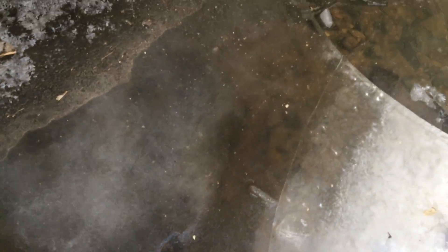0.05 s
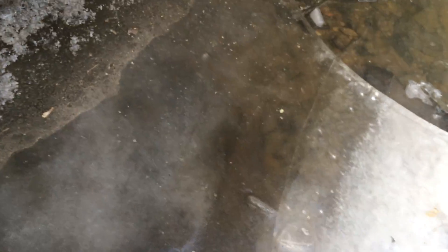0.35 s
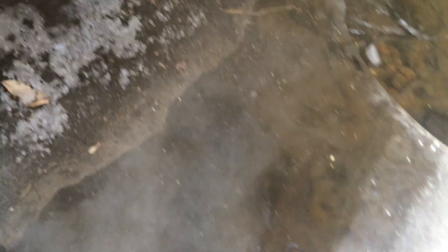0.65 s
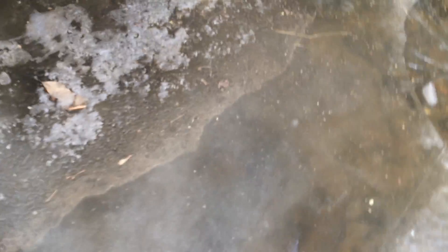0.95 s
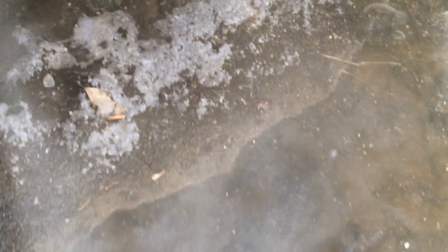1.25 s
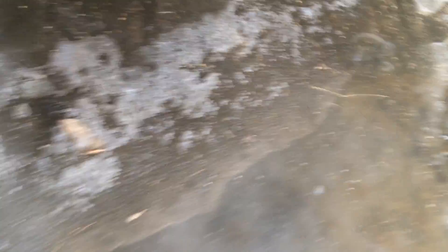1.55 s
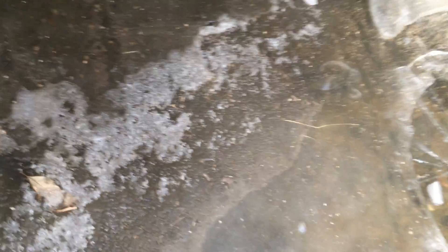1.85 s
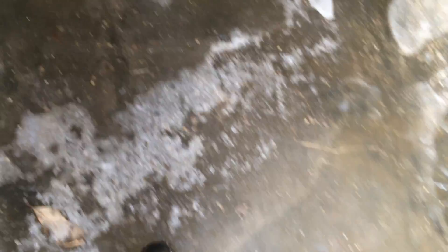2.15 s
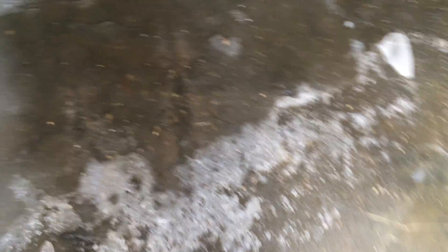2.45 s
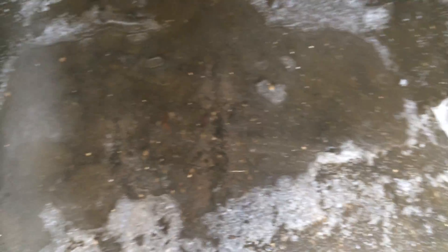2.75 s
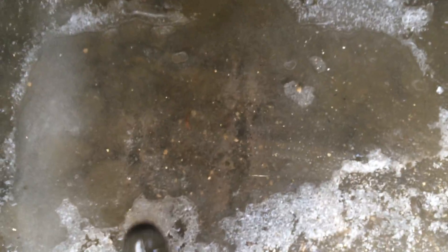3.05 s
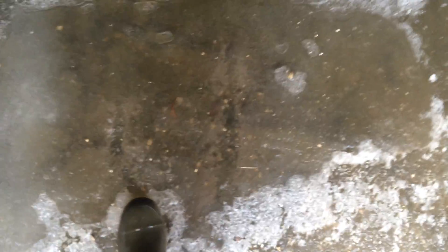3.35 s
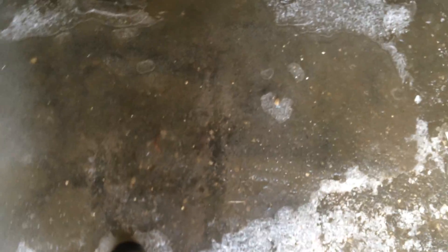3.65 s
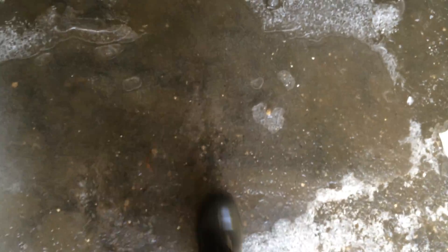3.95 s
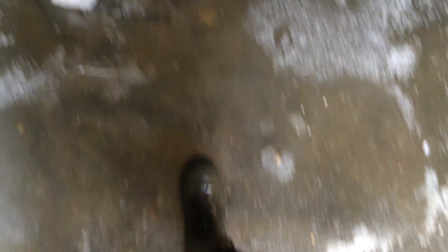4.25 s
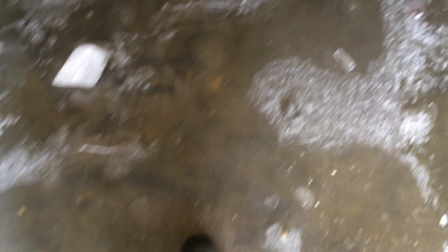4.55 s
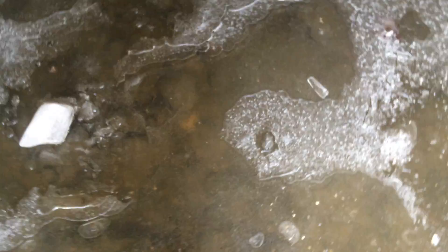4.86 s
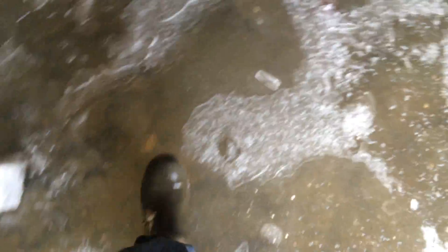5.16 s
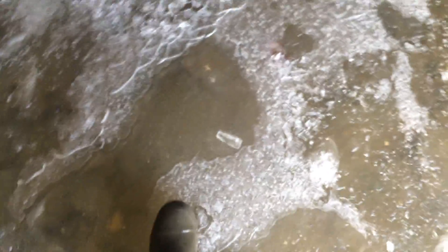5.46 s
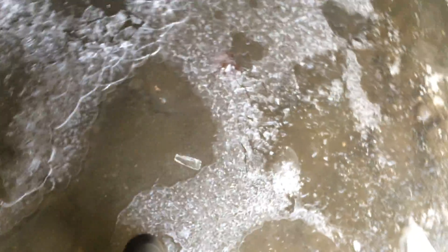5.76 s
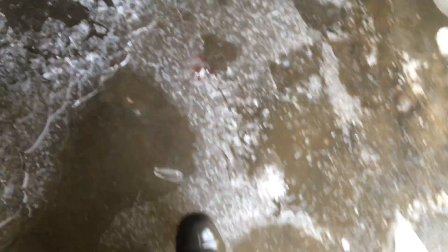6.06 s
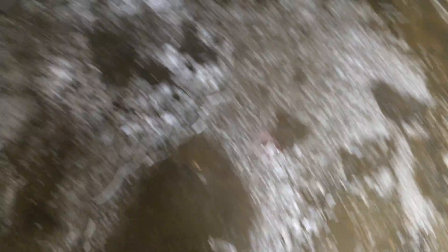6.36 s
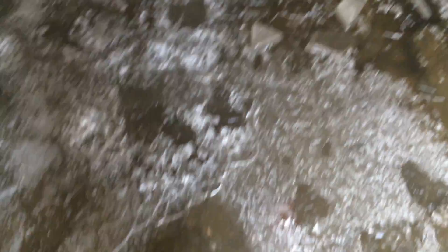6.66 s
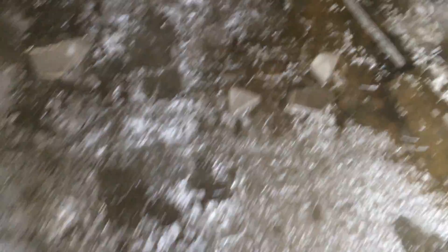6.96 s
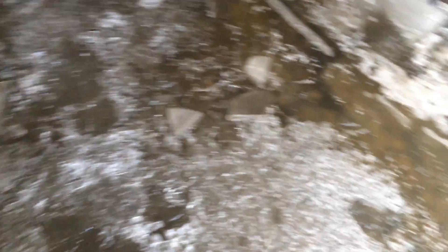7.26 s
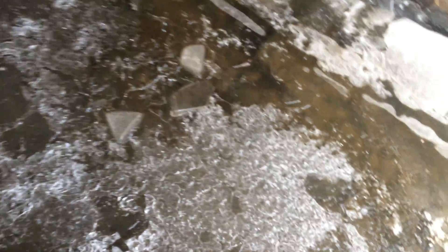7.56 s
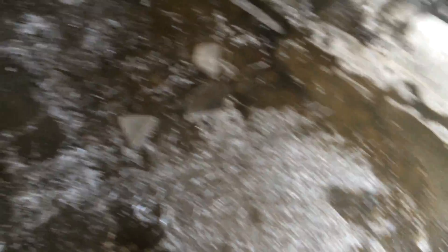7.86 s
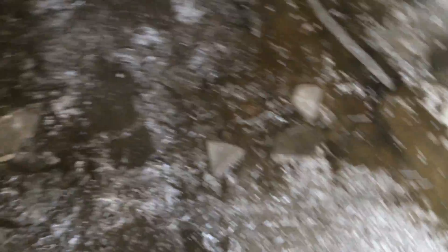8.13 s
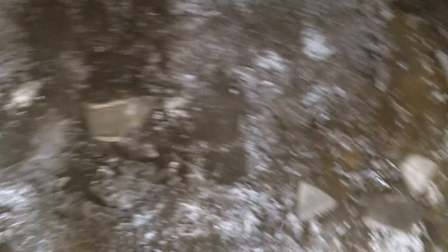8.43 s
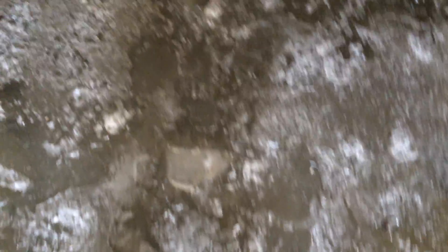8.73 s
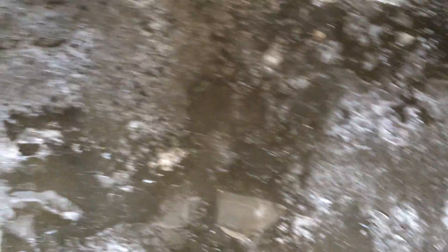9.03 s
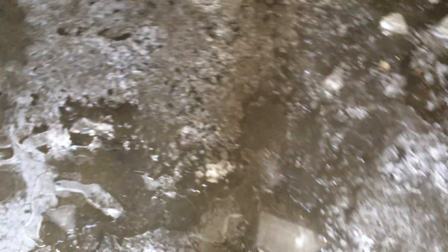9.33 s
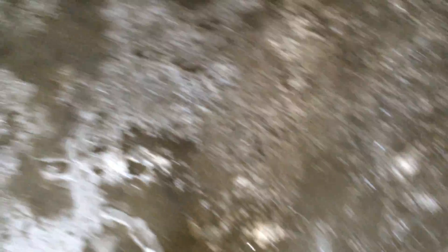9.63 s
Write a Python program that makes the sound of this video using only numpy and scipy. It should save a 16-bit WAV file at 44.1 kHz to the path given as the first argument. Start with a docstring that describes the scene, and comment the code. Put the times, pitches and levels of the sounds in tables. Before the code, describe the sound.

A boot cracks thin ice and sloshes through a shallow puddle, with wet crunching, bubbles and faint distant traffic.

```python
"""A boot on thin ice

A rubber boot treads on thin ice over a shallow puddle, outdoors. The sheet gives way in bursts of
tiny fractures and wet crumbs grind under the sole. Water and slush are pushed about in short surges
and gurgle between the pieces, where trapped air rings as bubbles. Towards the end the boot wades on
with dull thuds. A far engine speeds up and eases off over traffic, and a small bird calls once."""
import sys
import numpy as np
from scipy import signal
from scipy.fft import rfft, irfft
from scipy.io import wavfile

SR = 44100
rng = np.random.default_rng(int(sys.argv[2]) if len(sys.argv) > 2 else 0)


def master(y):
    """Save y as 16-bit WAV."""
    cut = np.clip(np.atleast_2d(y).T, -1, 1)
    pcm = np.round(cut * 32767)  # scale
    wavfile.write(sys.argv[1], SR, pcm.astype(np.int16))


N = 431738


def from_db(db):
    """Amplitude grows tenfold for every 20 dB."""
    return 10 ** (np.asarray(db) / 20)


def unit_rms(x):
    """Normalisation to a mean power of 1."""
    return x / np.sqrt(np.mean(x ** 2) + 1e-20)


def curves(rows):
    """Linear interpolation of each column at every sample; the first column is time."""
    times, *columns = np.transpose(rows)
    return [np.interp(np.arange(N) / SR, times, column) for column in columns]


def add(track, start_s, sound):
    """Superposition: a short sound adds to a track."""
    start = int(round(start_s * SR))
    sound, start = sound[max(0, -start):], max(0, start)
    track[start:start + len(sound)] += sound[:max(0, N - start)]


def butter(x, hz, kind, order=2):
    """A causal Butterworth filter, maximally flat in its passband."""
    sections = signal.butter(order, np.clip(hz, 10, SR * 4 / 9), kind, fs=SR, output="sos")
    return signal.sosfilt(sections, x + 1e-18)


def resonate(x, hz, width_hz):
    """A damped resonator with a peak gain of 1."""
    r = np.exp(-np.pi * width_hz / SR)
    feedback = [1, -2 * r * np.cos(2 * np.pi * hz / SR), r * r]
    return signal.lfilter(np.array([1, 0, -1]) * (1 - r * r) / 2, feedback, x + 1e-18)


def drift(rate_hz):
    """Low-passed noise: a smooth random fluctuation of rms 1."""
    r = np.exp(-80 * np.pi * rate_hz / SR)
    slow = signal.lfilter([1], [1, -2 * r, r * r], rng.standard_normal(N // 40 + 2002))[2000:]
    return np.interp(np.arange(N) / 40, np.arange(len(slow)), unit_rms(slow))


def coloured(x, spectrum, size=4096):
    """Minimum-phase filtering imposes a spectral envelope; the result has rms 1."""
    hz, db = np.transpose(spectrum)
    grid_hz = np.maximum(np.fft.rfftfreq(size, 1 / SR), 1)
    gain = from_db(np.interp(np.log(grid_hz), np.log(hz), db))
    cepstrum = irfft(np.log(gain))
    cepstrum[1:size // 2] *= 2
    cepstrum[size // 2 + 1:] = 0
    response = irfft(np.exp(rfft(cepstrum)))
    return unit_rms(signal.oaconvolve(x, response)[:N])


def impulses(per_s, spread_db, size=N):
    """A Poisson process of clicks, many small and a few large."""
    heights = from_db(spread_db * np.minimum(rng.exponential(1, size), 4))
    return heights * rng.choice([-1, 1], size) * (rng.random(size) < per_s / SR)


def pings(per_s, low_hz, high_hz, cycles, spread_db, rise):
    """Damped oscillators start at random, each gliding up as it dies; their sum has rms 1."""
    when, pitch, size, length = rng.random((int(per_s * N / SR), 4)).T[:, :, None]
    hz = low_hz * (high_hz / low_hz) ** pitch
    t = np.arange(int(min(3 * cycles / low_hz, .025) * SR) + 8) / SR
    age = t * hz / (cycles * (.5 + length))  # in decay times
    height = from_db(spread_db * np.minimum(-np.log(1 - size), 4))
    phase = 2 * np.pi * hz * t * (1 + rise * np.minimum(age, 4))
    waves = height * np.sin(phase) * np.exp(-age) * (1 - np.exp(-t * hz))
    samples = (when * N).astype(int) + np.arange(len(t))
    return unit_rms(np.bincount(samples.ravel(), waves.ravel(), N)[:N])


def reflections(x, t60_s, cutoff_hz):
    """Diffuse reflection from ground and surroundings: a decaying noise tail of unit energy."""
    t = np.arange(SR // 2) / SR
    tail = butter(rng.standard_normal(len(t)), cutoff_hz, "low", order=1)
    tail *= from_db(-60 * t / t60_s) * (1 - np.exp(-t / 0.00033))
    return signal.oaconvolve(x, tail / np.linalg.norm(tail))[:N]


# The engine's run. Each row: time in seconds, firing rate in Hz, relative level in dB.
ENGINE_RUN = [(0, 62, -47.5), (1.3, 72.5, -44.5), (1.55, 75, -38), (2.4, 83.2, -34.5), (3.1, 92.4, -38),
              (3.5, 98, -45.5), (3.9, 104.5, -44.5), (4.3, 85, -50), (5.2, 70, -64), (5.8, 101, -64),
              (6.8, 106, -59.5), (7.6, 95, -51), (7.8, 93, -83)]
# Its partials. Each row: multiple of the firing rate, relative level in dB.
ENGINE_ORDERS = [(1, -2.5), (1.5, -16.5), (2, -21)]

def engine(gain_db=2.0, waver_db=2.0):
    """Periodic firing radiates a series of orders, of which only the lowest carry far."""
    firing_hz, db = curves(ENGINE_RUN)
    phase = 2 * np.pi * np.cumsum(firing_hz) / SR
    tone = sum(from_db(order_db + waver_db * drift(4.4)) * np.sin(order * phase)
               for order, order_db in ENGINE_ORDERS)
    return np.sqrt(2) * from_db(db + gain_db) * tone


# The traffic's swell. Each row: time in seconds, rms level in dB.
TRAFFIC_LEVELS = [(0, -45), (1.1, -50), (3.2, -45.5), (5.4, -54), (6.5, -50.5), (8.2, -53), (8.8, -46),
                  (9.3, -49.5), (9.79, -45)]
# Its spectrum. Each row: frequency in Hz, relative spectral density in dB.
TRAFFIC_SPECTRUM = [(20, -31), (40, -4), (65, -1), (90, 1.5), (130, -2), (190, -5.5), (280, -24),
                    (500, -21), (1000, -64)]

def traffic():
    """Far traffic sums incoherently to a low rumble of noise."""
    return from_db(curves(TRAFFIC_LEVELS)[0]) * coloured(rng.standard_normal(N), TRAFFIC_SPECTRUM)


# Pushes on the slush. Each row: end of the rise in seconds, hold in seconds, slosh and crunch in dB.
SLUSH_SURGES = [(0.0, .19, -52, -55.5), (0.498, 0.095, -50.5, -57.5), (0.996, 0.091, -53.5, -68),
                (1.262, 0.15, -52, -62), (1.522, 0.1, -51, -58.5), (1.712, .11, -52, -59),
                (1.997, 0.045, -54, -62.5), (2.241, 0.081, -51.5, -60), (2.403, 0.19, -47.5, -57),
                (2.772, 0.1, -50, -58.5), (3.077, 0.42, -53.5, -59), (3.622, 0.063, -45.5, -57.5),
                (3.9, 0.13, -46.5, -57.5), (4.152, 0.13, -50, -60), (4.428, 0.13, -52, -60),
                (4.67, 0.28, -54, -62.5), (5.816, 0.017, -56, -72), (5.957, 0.14, -51, -62.5),
                (6.358, 0.3, -56.5, -62), (6.498, 0.025, -44, -55), (6.721, 0.029, -51.5, -56),
                (6.992, 0.42, -61, -66.5), (7.377, 0.066, -45.5, -56), (7.608, 0.053, -58.5, -60),
                (7.885, .14, -52, -63), (8.203, .14, -50.5, -57), (8.487, 0.068, -46.5, -51.5),
                (8.776, 0.12, -45.5, -53.5), (9.084, 0.097, -47.5, -57), (9.404, 0.099, -55, -50),
                (9.688, 0.13, -47, -51.5)]
# The puddle's motion between surges. Each row: time in seconds, level in dB.
PUDDLE_LAPPING = [(0, -50.5), (0.65, -55.5), (0.85, -57.5), (2.1, -56), (2.6, -50.5), (4.3, -52.5),
                  (5.3, -60.5), (5.6, -56.5), (6.3, -53), (6.85, -56.5), (7.15, -55), (7.75, -58.5),
                  (8.7, -51), (9.79, -48.5)]

def stirring(attack_s=0.072, release_s=0.045, crumbs_db=-13):
    """Incoherent powers add: surges on top of lapping give the slosh and crunch levels in dB."""
    lapping = from_db(curves(PUDDLE_LAPPING)[0])
    water_power = lapping ** 2
    crumb_power = (from_db(crumbs_db) * lapping) ** 2  # floating crumbs rub with the lapping
    age = np.arange(SR) / SR - attack_s
    for full_s, hold_s, slosh_db, crunch_db in SLUSH_SURGES:
        surge = np.clip(1 + age / attack_s, 0, 1) * np.exp(-np.maximum(age - hold_s, 0) / release_s)
        add(water_power, full_s - attack_s, (from_db(slosh_db) * surge) ** 2)
        add(crumb_power, full_s - attack_s, (from_db(crunch_db) * surge) ** 2)
    return 10 * np.log10(water_power), 10 * np.log10(crumb_power)


# The water's wash. Each row: frequency in Hz, relative spectral density in dB.
WASH_SPECTRUM = [(120, -12), (250, 5.5), (500, 4), (1000, 2.5), (1700, 0.5), (2600, -9), (4000, -19.5),
                 (6500, -20), (15000, -30.5)]

def slosh(level_db, plop_db=-7.0, wash_db=-1.5):
    """Air entrainment: over a soft wash, small bubbles gain in share as the water moves more."""
    plops = pings(per_s=480, low_hz=520, high_hz=3750, cycles=2.3, spread_db=7.5, rise=0.01)
    plops = unit_rms(butter(plops, 3000, "low", order=1))
    activity = np.clip((level_db + 59) / 11, 0, 1)
    wash = coloured(rng.standard_normal(N), WASH_SPECTRUM) * from_db(drift(33))
    return from_db(level_db) * (from_db(plop_db) * activity * plops + from_db(wash_db) * wash)


# The hiss of grinding ice. Each row: frequency in Hz, relative spectral density in dB.
HISS_SPECTRUM = [(1500, -1), (3000, 6), (5000, -4.5), (7000, -0.5), (9500, -1), (12500, -1.5),
                 (15500, -5.5)]

def crunch(level_db, tick_db=-5.0, hiss_db=-1.0):
    """Granular friction: wet crumbs grind under the sole, giving pitched ticks over a fine hiss."""
    ticks = pings(per_s=450, low_hz=3520, high_hz=15000, cycles=3.1, spread_db=4.0, rise=.005)
    ticks = unit_rms(butter(ticks, 6800, "high", order=1))
    hiss = coloured(rng.standard_normal(N), HISS_SPECTRUM) * from_db(3.75 * drift(42))
    activity = np.clip((level_db + 81.0) / 18, 0, 1)
    return from_db(level_db) * (from_db(tick_db) * activity * ticks + from_db(hiss_db) * hiss)


# A chip's tick. Each row: frequency in Hz, relative spectral density in dB.
CHIP_SPECTRUM = [(700, -7), (1600, 6), (2900, 2), (4500, 12.5), (7500, 5.5), (12000, 7), (15500, -5)]

def chips(crunch_db, relative_db=-13.5, decay_s=0.00078):
    """Shot noise: crumbs chip off at random, as lone brittle ticks that stand out of the crunch."""
    t = np.arange(SR // 100) / SR
    burst = rng.standard_normal(len(t)) * np.exp(-t / decay_s)
    ticks = signal.oaconvolve(impulses(per_s=29, spread_db=7.0), burst)[:N]
    return from_db(crunch_db + relative_db) * coloured(ticks, CHIP_SPECTRUM)


# Ice cracks, and a brief soft rush of noise leading into two of the loud ones (at 4.849 and 6.454 s).
# Each row: start in seconds, knock level in dB, knock pitch in Hz, snap level in dB, snap pitch in Hz,
# splinter level in dB, decay in seconds.
CRACKS_AND_RUSHES = [(0.039, -33, 930, -34.5, 1900, -51, 0.013), (0.074, -37.5, 574, -45, 1260, -63, 0.01),
                     (0.138, -41.5, 570, -41, 1720, -48, .011), (0.175, -65, 630, -64, 1730, -47.5, .011),
                     (0.206, -42.5, 980, -54, 1390, -47, 0.0078),
                     (0.3905, -20.5, 590, -28.5, 2430, -34.5, 0.0022),
                     (0.399, -27, 600, -28.5, 1710, -38, 0.018), (0.513, -60, 900, -41, 2210, -55, .006),
                     (0.538, -66, 760, -39, 1780, -44, 0.011), (0.575, -64, 930, -36.5, 2230, -58, 0.0091),
                     (1.164, -65, 630, -73, 1670, -59, 0.0016), (1.544, -44, 770, -44, 2360, -47.5, 0.0051),
                     (1.572, -43, 710, -40.5, 2300, -45, 0.0034),
                     (2.4024, -27.5, 744, -20.5, 1380, -48, 0.0023),
                     (2.405, -18, 642, -22, 1500, -30, 0.0033), (2.547, -40.5, 750, -39.5, 1490, -58, 0.01),
                     (2.672, -66, 460, -51, 2130, -48.5, 0.00098),
                     (2.8206, -59, 826, -44.5, 1820, -47.5, 0.0077),
                     (2.9033, -48, 1080, -30.5, 1380, -52.5, 0.0029),
                     (3.103, -51, 640, -41, 3250, -51.5, 0.0023),
                     (3.202, -43.5, 676, -43, 2360, -58, 0.0023),
                     (3.241, -43, 1000, -40.5, 1600, -57, 0.0028),
                     (3.472, -52, 765, -44.5, 2380, -52, .007), (3.742, -42.5, 730, -60, 1690, -64, 0.0064),
                     (4.0208, -40, 440, -37, 1430, -59, .0055),
                     (4.1269, -42.5, 420, -39.5, 2100, -43.5, 0.013),
                     (4.2183, -43, 874, -41, 1570, -57, 0.0031),
                     (4.516, -43, 720, -38.5, 1410, -55, 0.0078), (4.77, -66, 700, -69, 3680, -65, .002),
                     (4.849, -37, 556, -35.5, 2130, -51, 0.012),
                     (4.8547, -28.5, 740, -30, 1700, -47, 0.0055), (4.878, -42, 597, -40, 1730, -55, .012),
                     (5.081, -55.5, 705, -62, 3350, -68, 0.0015),
                     (5.8004, -39.5, 840, -45, 1610, -55, 0.0062),
                     (6.347, -48, 785, -49, 1810, -51.5, 0.0042),
                     (6.454, -39, 750, -37.5, 1300, -55, 0.015),
                     (6.467, -21.5, 755, -25.5, 2040, -36.5, 0.0084),
                     (6.479, -26.5, 800, -30.5, 2450, -38, .011),
                     (6.497, -31.5, 765, -36, 2500, -35, 0.021),
                     (6.5477, -55, 590, -43.5, 4120, -45.5, 0.0011),
                     (6.6378, -35, 826, -31.5, 2270, -41, .0017),
                     (6.744, -49, 720, -38.5, 3100, -44.5, 0.0017),
                     (6.866, -75, 850, -52.5, 2350, -51.5, 0.0017),
                     (7.417, -62, 800, -44.5, 5700, -41, 0.0027), (7.506, -54, 710, -70, 2500, -58, 0.0014),
                     (7.687, -57, 450, -55.5, 1780, -62, 0.0029), (7.739, -63, 460, -57, 1470, -59, 0.0027),
                     (7.863, -45, 463, -47, 1850, -61, .008), (8.063, -56, 660, -53.5, 1660, -54.5, 0.0028),
                     (8.266, -34, 620, -36.5, 1570, -47, 0.0086),
                     (8.336, -64, 510, -49.5, 2540, -51, 0.0033), (8.364, -68, 680, -47.5, 2640, -53, .002),
                     (8.483, -44.5, 636, -45.5, 2630, -45, 0.0097),
                     (8.522, -43, 760, -42, 2260, -45, .0032), (8.567, -47, 780, -41, 4140, -49, 0.0018),
                     (8.611, -45, 444, -41.5, 2780, -49, 0.0021),
                     (8.845, -44, 516, -42.5, 2080, -60, 0.0031),
                     (8.9006, -57, 735, -35.5, 1470, -61, 0.0015),
                     (9.1285, -34, 900, -42, 1320, -46.5, 0.0041),
                     (9.179, -45, 537, -50, 2580, -43.5, 0.0027),
                     (9.2221, -56, 490, -39.5, 2420, -48.5, 0.0014),
                     (9.3845, -53, 547, -43.5, 1770, -58, 0.018),
                     (9.45, -54, 730, -51, 2030, -56.5, 0.0035), (9.48, -44.5, 680, -45, 2520, -44, 0.0055),
                     (9.5183, -37.5, 660, -40.5, 1850, -54, .009),
                     (9.7427, -35.5, 520, -41.5, 1200, -46, 0.0052),
                     (9.773, -35, 378, -37, 1990, -54, .012)]

def cracks(settle_db=-31, settle_s=0.034, sheet_hz=510, sheet_width_hz=260, top_splinter_hz=10730):
    """Brittle fracture: in a crack, a dying shower of clicks makes the sheet knock, its edges snap
    and splinter. The two soft rushes are noise shaped in the same way."""
    out, t = np.zeros(N), np.arange(SR // 8) / SR
    ten_ms_gain = np.sqrt(.01 * SR / len(t))  # a level is the rms of the energy packed into 10 ms
    settling = from_db(settle_db) * np.exp(-t / settle_s)  # after a crack the pieces go on rubbing
    for start_s, knock_db, knock_hz, snap_db, snap_hz, splinter_db, decay_s in CRACKS_AND_RUSHES:
        envelope = np.exp(-t / max(decay_s, 1e-3)) + settling
        shower = unit_rms(impulses(per_s=5000, spread_db=3.0, size=len(t)) * envelope)
        clean = np.exp(-decay_s / 0.001)  # the shorter the crack, the more it is one broad pop
        shower[0] += 0.94 * (0.33 + 4 * clean) * np.sqrt(len(t))  # the opening click
        knock = resonate(shower, knock_hz, 0.32 * (1 + 3 * clean) * knock_hz)
        knock = butter(knock, [0.51 * knock_hz, 2.3 * knock_hz], "band", order=3)
        snap = resonate(shower, snap_hz, 0.23 * (1 + 2 * clean) * snap_hz)
        snap = butter(snap, [900, 5200], "band")
        # weaker splinters ring lower, by an octave per 53 dB below the snap
        splinter_hz = top_splinter_hz * 2 ** (min(splinter_db - snap_db, 0) / 53)
        splinters = butter(resonate(shower, splinter_hz, 0.41 * splinter_hz), 1900, "high")
        hollow = resonate(resonate(shower, sheet_hz, sheet_width_hz), sheet_hz, sheet_width_hz)
        parts = (knock, knock_db - 0.4), (hollow, knock_db - 8), (snap, snap_db), (splinters, splinter_db)
        add(out, start_s, ten_ms_gain * sum(from_db(db) * unit_rms(part) for part, db in parts))
    return out


# The boot's weight lands. Each row: start in seconds, relative peak in dB, the blow's cutoff in Hz.
FOOTFALLS = [(0.074, -42, 400), (0.39, -29.5, 800), (2.405, -35, 600), (4.857, -29.5, 600),
             (7.455, -38, 400), (7.872, -35, 400), (8.295, -34, 400), (8.848, -27.5, 328),
             (8.869, -30, 328), (9.189, -36, 300), (9.382, -37.5, 300), (9.479, -34.5, 300),
             (9.765, -18, 290)]
# The boot's resonances. Each row: frequency in Hz, bandwidth in Hz, gain in dB.
BOOT_MODES = [(145, 35, -21.5), (190.3, 27.5, 10), (263, 19, -11), (314, 12, 0.5), (440, 79, -10.5)]

def thuds(contact_s=0.00088, gain_db=4.5):
    """Modal response: a brief push on the soft sole makes the boot boom at its low resonances."""
    out, t = np.zeros(N), np.arange(SR // 5) / SR
    for start_s, db, cutoff_hz in FOOTFALLS:
        push = (t == 0) + 0.12 * rng.standard_normal(len(t)) * np.exp(-t / contact_s)
        boom = sum((-1) ** k * from_db(mode_db) * resonate(push, hz, width_hz)
                   for k, (hz, width_hz, mode_db) in enumerate(BOOT_MODES))
        boom = butter(boom, cutoff_hz, "low")
        add(out, start_s, from_db(db + gain_db) * boom / np.abs(boom).max())
    return out


def stray_pockets(low_hz=900, high_hz=2770, over_slosh_db=7.5, decay_cycles=5.0):
    """Each surge frees one lesser bubble; at constant Q, its decay time is inverse to its pitch."""
    when, pitch = rng.random((len(SLUSH_SURGES), 2)).T
    full_s, hold_s, slosh_db, _ = np.transpose(SLUSH_SURGES)
    hz = low_hz * (high_hz / low_hz) ** pitch
    return list(zip(full_s + when * hold_s, slosh_db + over_slosh_db, hz, decay_cycles / hz))


# Large bubbles. Each row: start in seconds, level in dB, starting pitch in Hz, decay in seconds.
AIR_POCKETS = [(0.471, -44, 1100, .009), (0.52, -29, 1890, 0.002), (0.548, -29, 1890, .0044),
               (0.575, -29, 2003, 0.0024), (0.586, -32, 1680, .0037), (1.1, -39.5, 1410, 0.005),
               (1.15, -41, 855, 0.0059), (1.432, -36.5, 548, 0.0081), (1.697, -33, 1080, 0.0037),
               (2.126, -39.5, 1430, 0.0064), (2.368, -24.5, 1930, 0.0037), (2.809, -38, 2840, .0027),
               (2.999, -34.5, 890, 0.0076), (3.187, -37, 3000, .003), (3.281, -39, 910, .004),
               (3.313, -37.5, 1150, 0.0075), (3.364, -35.5, 955, 0.0068), (3.657, -38.5, 955, 0.0083),
               (3.743, -31.5, 1750, 0.0035), (3.805, -32, 1970, 0.003), (3.814, -36.5, 790, 0.0044),
               (4.387, -39.5, 839, 0.0044), (5.723, -41.5, 1000, .0032), (5.801, -28, 1660, .0043),
               (6.083, -37, 2350, 0.0068), (6.189, -36.5, 1504, 0.01), (6.626, -38, 1297, 0.016),
               (6.691, -39, 1610, .008), (6.704, -26, 4380, .0011), (6.727, -27.5, 2000, .0012),
               (6.775, -30.5, 1940, 0.0058), (8.231, -31, 1410, .004), (8.879, -27, 2430, 0.0018),
               (8.983, -35, 630, 0.012), (9.181, -30, 2580, 0.0028), (9.287, -41, 800, .0056),
               (9.315, -36, 2480, .003), (9.338, -36, 720, .0036), (9.596, -35.5, 628, 0.013),
               (9.664, -32.5, 2930, .0028), (9.723, -27.5, 3130, .0027)]

def bubbles(attack_s=0.0001, splash_db=-9):
    """Bubble resonance: air pinches off with a splash and rings, rising in pitch near the surface."""
    out, t = np.zeros(N), np.arange(SR // 16) / SR
    for start_s, db, hz, decay_s in AIR_POCKETS + stray_pockets():
        climb = rng.uniform(.22, .45) * np.tanh((t * np.sqrt(hz / 2000) / .017) ** 1.6)
        phase = 2 * np.pi * np.cumsum(hz * (1 + climb)) / SR
        decay = np.exp(-t / decay_s) + from_db(-17) * np.exp(-t / 0.0026)
        ring = np.sin(phase) * (1 - np.exp(-t / attack_s)) * decay
        splash = unit_rms(resonate(rng.standard_normal(len(t)), hz, 0.23 * hz)) * np.exp(-t / 0.0025)
        add(out, start_s, from_db(db) * (ring + from_db(splash_db) * butter(splash, 2 * hz, "low")))
    return out


# Air and water forced from under the sole. Each row: start in seconds, length in seconds, level in dB.
SQUEEZES = [(0.498, 0.02, -48), (0.542, 0.039, -39), (3.259, 0.15, -50.5), (4.086, 0.12, -55.5),
            (5.944, 0.047, -47.5), (5.997, 0.074, -52.5), (6.063, 0.075, -47.5), (6.138, 0.11, -59),
            (7.365, 0.024, -54), (8.485, 0.15, -52.5), (8.833, .06, -61), (9.112, 0.042, -46.5)]

def gurgles():
    """Two-phase flow: each squeeze lets out a dense string of small chirping bubbles."""
    flow = np.zeros(N)
    for start_s, length_s, db in SQUEEZES:
        add(flow, start_s, from_db(db) * signal.windows.tukey(int(length_s * SR), .4))
    chirps = pings(per_s=1900, low_hz=1143, high_hz=4930, cycles=5.2, spread_db=6.0, rise=0.052)
    return flow * unit_rms(butter(chirps, 3500, "low", order=1))


# The bird's call. Each row: start in seconds, length in seconds, peak level in dB.
BIRD_NOTES = [(0.626, 0.063, -54), (.686, 0.031, -55), (0.719, 0.038, -54), (0.76, 0.033, -50),
              (0.797, 0.034, -50.5)]

def bird(start_hz=8370, end_hz=7380, fall_s=0.0091):
    """Frequency modulation: five thin whistles each slide exponentially down to a held pitch."""
    out = np.zeros(N)
    for start_s, length_s, db in BIRD_NOTES:
        t = np.arange(int(length_s * SR)) / SR
        hz = end_hz + (start_hz - end_hz) * np.exp(-t / fall_s)
        whistle = np.sin(2 * np.pi * np.cumsum(hz) / SR)
        add(out, start_s, from_db(db) * signal.windows.tukey(len(t), .5) * whistle)
    return out


def scene():
    """Superposition in one channel: ice and water close by, engine, traffic and bird far off."""
    slosh_db, crunch_db = stirring()
    pops, song = cracks() + bubbles(), bird()
    near = pops + from_db(-9.5) * reflections(pops, t60_s=0.059, cutoff_hz=7260)
    near += thuds() + slosh(slosh_db) + gurgles() + crunch(crunch_db) + chips(crunch_db)
    far = engine() + traffic() + song + from_db(-6.5) * reflections(song, t60_s=0.23, cutoff_hz=9000)
    return (near + far)[None, :]


def record(dry):
    """Band limiting: an elliptic low-pass cuts the treble steeply above 15.7 kHz."""
    return signal.sosfilt(signal.ellip(10, .1, 80, 15700, fs=SR, output="sos"), dry)


dry = scene()
out = record(dry)
master(out)
```